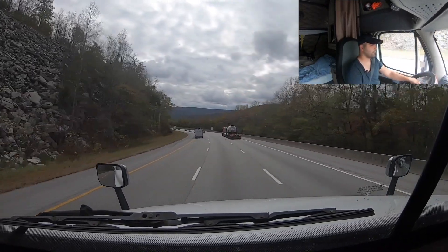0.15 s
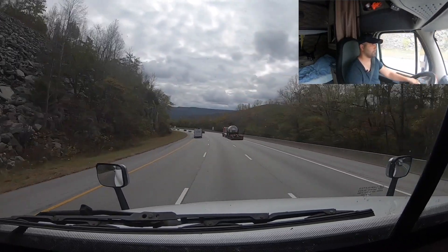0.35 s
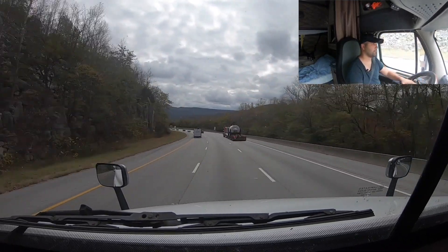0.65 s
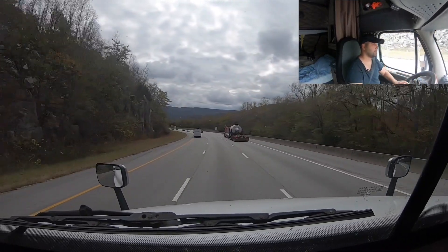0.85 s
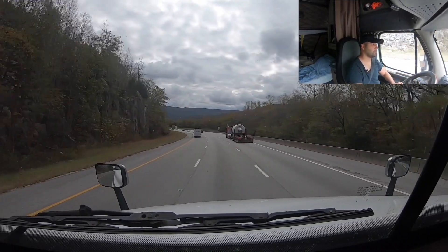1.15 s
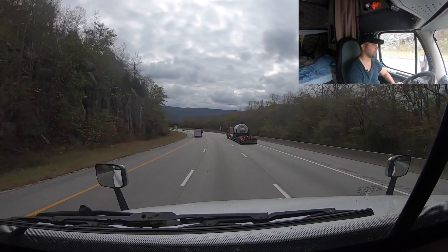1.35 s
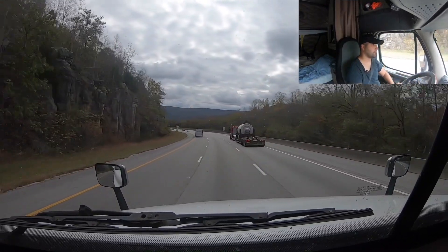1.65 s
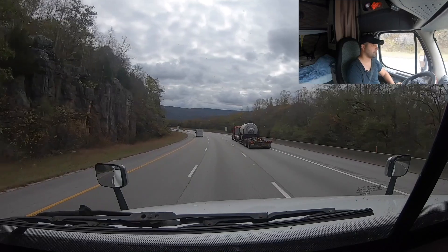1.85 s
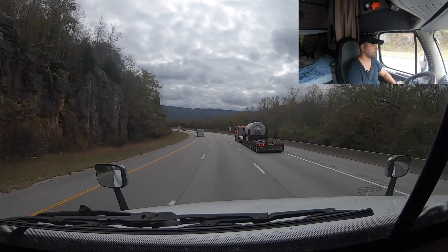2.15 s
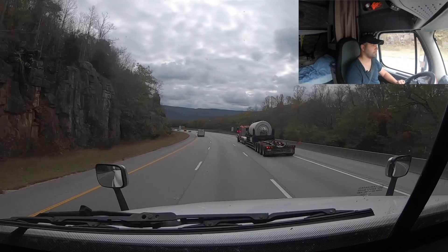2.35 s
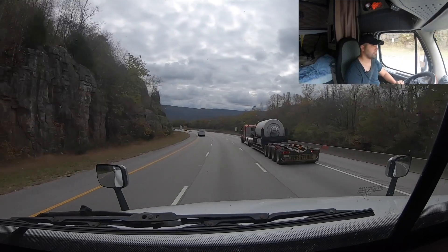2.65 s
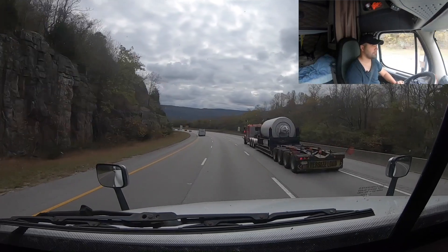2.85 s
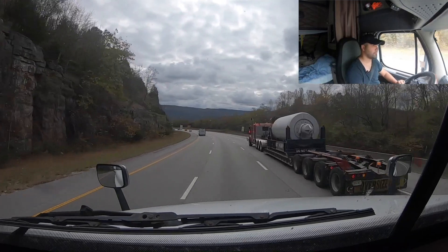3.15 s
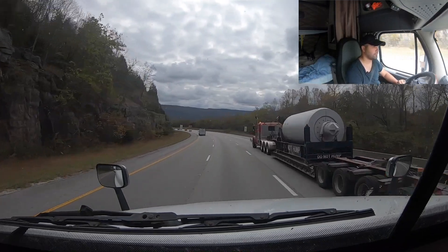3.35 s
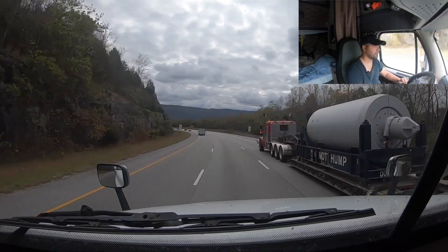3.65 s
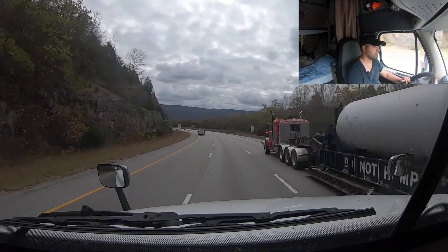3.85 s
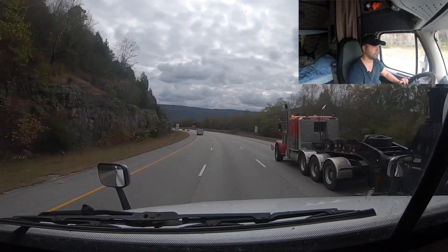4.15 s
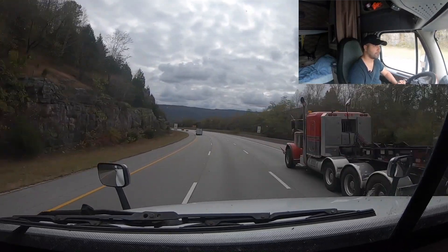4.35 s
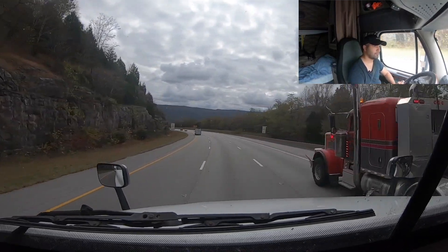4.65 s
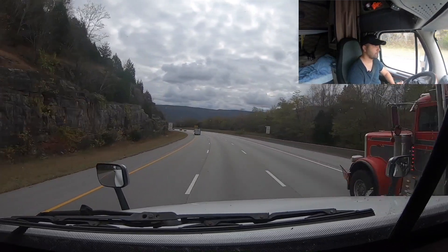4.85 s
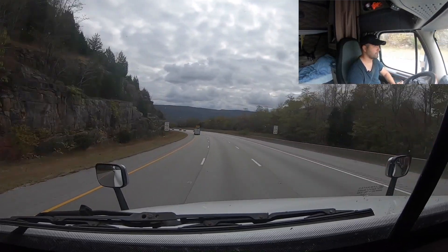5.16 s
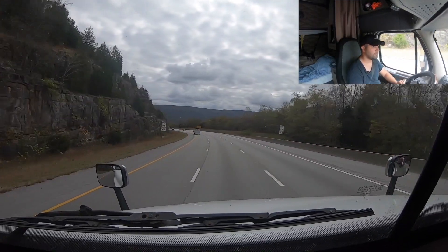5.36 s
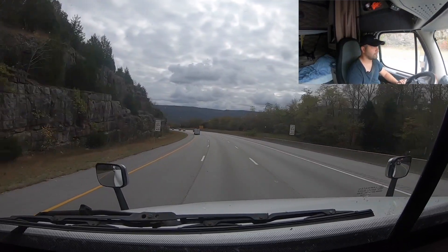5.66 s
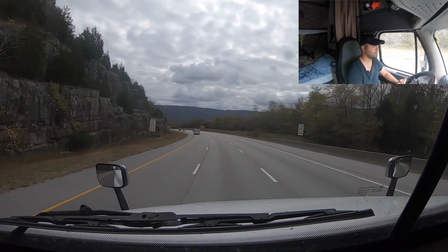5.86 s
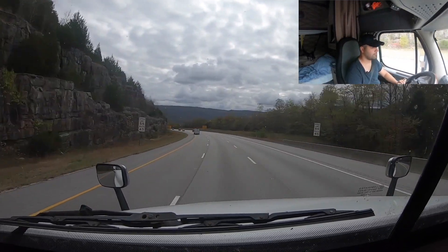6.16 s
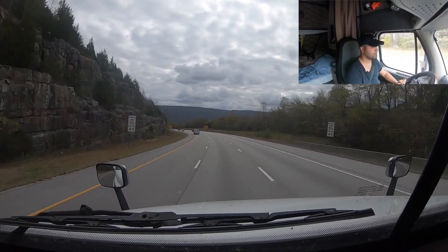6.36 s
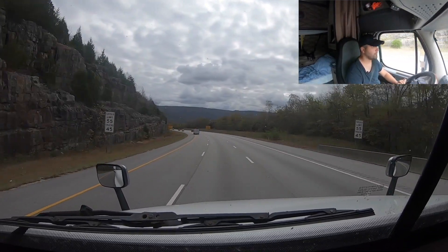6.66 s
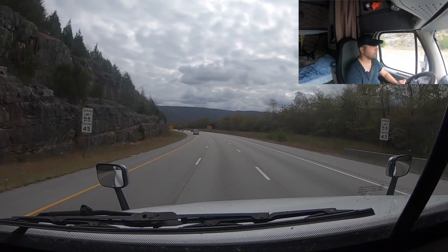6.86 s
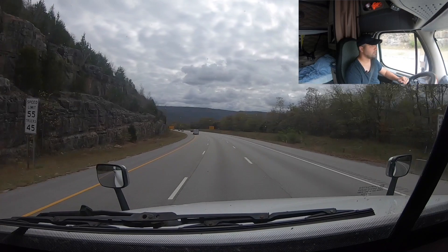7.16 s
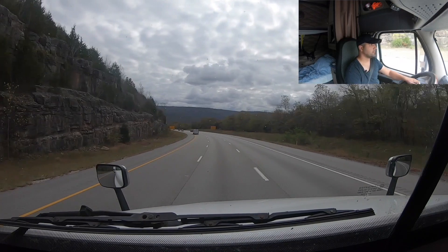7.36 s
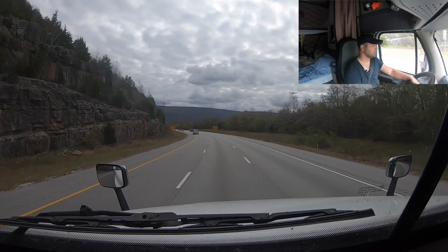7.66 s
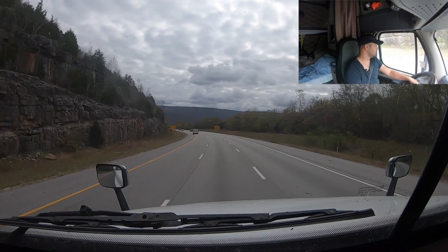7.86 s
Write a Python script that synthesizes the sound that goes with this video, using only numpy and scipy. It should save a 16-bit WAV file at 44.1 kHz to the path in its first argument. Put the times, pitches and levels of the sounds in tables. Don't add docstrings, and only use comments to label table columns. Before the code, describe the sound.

Inside a heavy truck cab, heard close to the dash, a big diesel drones low and steadily under engine braking, with rough clatter, valve hiss, a thin unsteady turbo whine, gear hum, tyre rumble and wind. Loose trim ticks, crackles and squeaks throughout. Around 2.1 s the brake releases with a soft low thump; clatter and hiss fall back and the whine sinks. At about 3 s the brake bites again and the whine climbs. From roughly 4 s a slower truck's exhaust swells alongside, beating against the cab's own drone, strongest near 5 s, then drops in pitch and fades by 6 s. Around 5.5 s braking releases again and a deep pulsing boom fills the cab, strongest near 6.2 s, easing unevenly. From about 6.9 s a faint door-seal whistle joins the hiss. Near 7.9 s the seat gives a short click and creak.

```python
import sys
import numpy as np
from scipy import signal
from scipy.fft import rfft, irfft
from scipy.io import wavfile
from scipy.ndimage import uniform_filter1d, map_coordinates

SR = 44100
rng = np.random.default_rng(int(sys.argv[2]) if len(sys.argv) > 2 else 0)


def voltage_ratio(level):
    return 10 ** (np.asarray(level, float) / 20)


def dump(signal):
    limited = np.clip(np.atleast_2d(signal).T, -1, 1)
    pcm = np.round(limited * 32767).astype(np.int16)
    wavfile.write(sys.argv[1], SR, pcm)


N = 353241
T = np.arange(N) / SR
PADDED = N + 39
HZ = np.maximum(np.fft.rfftfreq(PADDED, 1 / SR), 1)

# (time [s], rate [Hz])
CYCLE = [(0, 12.68), (1.9, 12.65), (2.9, 12.85), (5.4, 12.82), (6, 12.99), (7, 13.13), (8.1, 13.28)]
# (frequency [Hz], density [dB per Hz])
ROAD_COLOUR = [(5.9, -28), (10, -17), (38, -11), (108, -10.5), (138, -8), (226, -13.5), (289, -12),
               (382, -18), (645, -20.5), (879, -24), (1630, -46), (4510, -59.5), (6150, -51.5),
               (11800, -58.5), (16000, -61.5)]


def curve(table):
    s, value = np.transpose(table)
    return np.interp(T, s, value)


def shape(x, gain):
    return irfft(rfft(x, PADDED) * gain, PADDED)[:N]


def colour(table):
    hz, db = np.transpose(table)
    return voltage_ratio(np.interp(np.log(HZ), np.log(hz), db))


def peak(hz, width):
    return 1 / np.sqrt(1 + (2 * (HZ - hz) / width) ** 2)


def unit(x):
    return x / np.sqrt(np.mean(x ** 2))


def walk(rate):
    k = int(SR / rate)
    held = np.repeat(rng.standard_normal(600), k)[:N]
    return 1.45 * uniform_filter1d(uniform_filter1d(held, k), k)


def sine(turns, db):
    return np.sqrt(2) * voltage_ratio(db) * np.sin(2 * np.pi * turns)


def tone(turns, db, wander_db):
    return sine(turns + rng.random(), db + wander_db * walk(3.53))


def panels(share):
    # (frequency [Hz], width [Hz], level [dB])
    rings = [(348, 26, 7.5), (508, 16, 2), (752, 15, 8), (780, 36, 1.5), (1857, 25, 6), (2112, 14, -3),
             (3090, 20, 4.5)]
    return 1 + share * sum((voltage_ratio(db) - 1) * peak(hz, w) ** 2 for hz, w, db in rings)


def air(bands, flicker_db):
    out = 0
    for hz, width, db in bands:
        hiss = unit(shape(rng.standard_normal(N), peak(hz, width) ** 2))
        out = out + voltage_ratio(db + flicker_db * walk(25)) * hiss
    return out


def engine_orders(turns, brake):
    # (multiple of the cycle, braking level [dB rms], coasting level [dB rms], wander [dB])
    orders = [(1, -34, -38, 3), (2, -31, -29, 2.5), (4, -35, -34, 1.8), (7, -41, -35, 3),
              (8, -41, -44, 2.5), (9, -38, -30, 1), (10, -34, -42, 1.2), (18, -44, -53, 1.2),
              (20, -52, -54, 2), (21, -56, -50, 2), (26, -50, -49, 2), (27, -47, -51, 2.5),
              (30, -56, -50, 2), (32, -52, -58, 2), (36, -55, -53, 2), (38, -51, -54, 2), (57, -53, -55, 3),
              (64, -56, -60, 3), (66, -55, -59, 3), (72, -57, -62, 2), (69, -60, -55, 2),
              (83, -53, -68, 1.5), (93, -63, -72, 2), (126, -75, -70, 2), (144, -76, -72, 2)]
    # (multiple of the cycle, level [dB rms])
    valves = [(40, -55), (75, -58), (76, -59), (77, -59), (81, -62), (84, -60), (85, -63), (86, -63),
              (91, -64), (108, -66), (114, -67), (123, -68), (136, -69), (138, -70), (144, -69), (146, -70),
              (157, -71), (165, -72)]
    shifted = turns + 0.0208 * brake
    hum = sum(tone(k * shifted, off_db + (on_db - off_db) * brake, w) for k, on_db, off_db, w in orders)
    return hum + brake * sum(tone(k * turns, db, 2.5) for k, db in valves)


def driveline(turns, brake):
    # (multiple of the cycle, braking level [dB rms], coasting level [dB rms], wander [dB])
    shafts = [(1.21, -28, -30, 3.5), (2.824, -24.5, -29, 1.2), (8.473, -34.5, -39, 1.2),
              (33.38, -53, -52, 2), (62.12, -56, -62, 2), (97.75, -66, -63, 2)]
    out = sum(tone(k * turns, off_db + (on_db - off_db) * brake, w) for k, on_db, off_db, w in shafts)
    brake_db, coast_db, fade_db_per_s = -33, -39.5, -0.19
    mesh_db = coast_db + (brake_db - coast_db) * brake + fade_db_per_s * T
    dip_s, dip_span_s, dip_db = 5.2, .35, -4.5
    mesh_db = mesh_db + dip_db * np.exp(-((T - dip_s) / dip_span_s) ** 2)
    wheel_turns = .353 * turns
    mesh_db = mesh_db + (4.5 - 2.5 * brake) * np.cos(2 * np.pi * (wheel_turns + .4))
    twist = .45 * uniform_filter1d(brake, SR // 5)
    return out + tone(22 * turns + twist, mesh_db, 1.3)


def cab_boom(turns):
    # (time [s], level [dB rms])
    firing = [(0, -33.5), (.65, -28.5), (1.2, -49), (2.2, -48), (2.6, -33), (3.2, -39), (4, -25), (5, -26),
              (5.35, -29), (5.5, -16.5), (5.9, -17), (6.2, -14.5), (6.6, -16.5), (7.15, -21.5), (7.35, -18),
              (7.6, -20.5), (7.8, -26), (8.1, -30)]
    # (time [s], level [dB rms])
    overtone = [(0, -47), (1.1, -40.5), (1.8, -35), (2.3, -36), (3.3, -36), (4.5, -37), (5.6, -34),
                (6.25, -36), (6.45, -31), (7.25, -34), (7.5, -40), (8.1, -43)]
    return sine(6 * turns, curve(firing)) + tone(12 * turns, curve(overtone), 1)


def panel_tones(turns, brake):
    ring_hz, ring_width_hz, ring_db = 885, 9, -46.5
    out = 0
    for k in range(67, 72):
        off_tune = 2 * (k * curve(CYCLE) - ring_hz) / ring_width_hz
        out = out + tone(k * turns, ring_db - 9 * (1 - brake), 1.5) / np.hypot(1, off_tune)
    buzz_s, buzz_span_s, buzz_db = 4.1, .45, -53
    return out + sine(79 * turns, buzz_db - 10 * ((T - buzz_s) / buzz_span_s) ** 2)


def clatter(turns, brake):
    # (frequency [Hz], level [dB])
    blow_colour = [(150, -4.5), (330, -10), (500, -3.5), (650, -9), (900, -7.5), (1100, -15), (1500, -18),
                   (2200, -31), (3500, -32.5), (5000, -75)]
    on_db, off_db = -39.5, -47
    drift, change = .9, 1.1
    patterns = rng.standard_normal((40, 2048))
    steady = rng.standard_normal(2048)
    blows = map_coordinates(steady + change * patterns, [drift * T, turns % 1 * 2047], order=1)
    heard = unit(shape(blows, colour(blow_colour) * panels(0.52)))
    return voltage_ratio(off_db + (on_db - off_db) * brake) * heard


def brake_air(brake):
    # (frequency [Hz], width [Hz], level [dB rms])
    blowdown = [(5770, 500, -76), (6260, 600, -69), (6660, 120, -70), (6900, 330, -72), (14900, 1100, -67)]
    return brake * air(blowdown, 1.7)


def vents():
    # (frequency [Hz], width [Hz], level [dB rms])
    leaks = [(8400, 410, -79), (11900, 900, -80)]
    return air(leaks, 3.1)


def turbo(brake):
    idle_hz, kick_hz = 7800, 300
    up_s, down_s = 1.15, .4
    full = 807.5 * curve(CYCLE) - kick_hz
    hz, step = [full[0]], 441
    for on, full_hz in zip(brake[::step] > .5, full[::step]):
        target, lag_s = (full_hz, up_s) if on else (idle_hz, down_s)
        hz.append(hz[-1] + (target - hz[-1]) * step / SR / lag_s)
    hz = np.interp(T, np.arange(len(hz)) * step / SR, hz)
    boost = (hz - idle_hz) / (full - idle_hz)
    db = -67.8 - 6.5 * (1 - brake) + 6 * np.log10(boost) - 12 * np.clip(1 - 6 * boost, 0, 1)
    duct_hz, duct_width_hz, duct_db = 8330, 500, 7
    db = db + duct_db * (1 - brake) / (1 + (2 * (hz - duct_hz) / duct_width_hz) ** 2)
    hz = hz + kick_hz * brake
    skirt = unit(shape(rng.standard_normal(N), peak(0, 250)))
    flutter = voltage_ratio(2.8 * walk(30) + 1.1 * walk(7) - 1)
    return (flutter + .8 * skirt) * sine(np.cumsum(hz + 8 * walk(60)) / SR, db)


def road(turns, brake):
    noise = rfft(rng.standard_normal(PADDED)) * colour(ROAD_COLOUR) * panels(.6)
    low, mid, high, top = (1 / (1 + (HZ / hz) ** 6) for hz in (80, 1300, 5000, 8500))

    def band(gain):
        return unit(irfft(noise * gain)[:N])

    throb_db = (0.34 + walk(2.93)) * np.cos(2 * np.pi * (turns + 0.38)) + 1.1 * walk(25) + 0.4 * walk(7.4)
    alongside_s, span_s = 4.75, 1.4
    near = 1 / (1 + ((T - alongside_s) / span_s) ** 4)
    rumble_db = -28.5 + 3 * near + 1.3 * walk(3.99)
    roar_db = -33 + 2 * near + 0.73 * walk(3) - 1.5 * brake
    hiss_db = -57 + 0.5 * near + 3.5 * brake
    wind_db = hiss_db + 7 - 2.3 * brake + 0.3 * throb_db + 0.55 * walk(20)
    out = voltage_ratio(rumble_db) * band(low)
    out = out + voltage_ratio(roar_db) * band(mid - low)
    out = out + voltage_ratio(wind_db) * band(high - mid)
    out = out + voltage_ratio(hiss_db - 13.5 + .5 * throb_db) * band(top - high)
    return out + voltage_ratio(hiss_db - 6.5 + throb_db) * band(1 - top)


def crackle(brake):
    rate, level_db, decay_s = 55, -57, 0.0045
    size_db = np.minimum(3 * rng.exponential(size=N), 9)
    hits = (rng.random(N) < rate / SR) * voltage_ratio(size_db)
    tail = signal.lfilter([1], [1, -np.exp(-1 / (decay_s * SR))], hits)
    snaps = shape(tail * rng.standard_normal(N), peak(10800, 4000) ** 2)
    return voltage_ratio(level_db - 1.7 * brake) * snaps


def chirps():
    rate, half_length_s, over_road_db = 200, .012, -13.5
    out, t = np.zeros(N + SR), T[:1600]
    hz, db = np.transpose(ROAD_COLOUR)
    envelope = np.exp(-((t - .018) / half_length_s) ** 2)
    for at, pitch, size in rng.random((int(rate * N / SR), 3)):
        f = 1000 + 14500 * pitch ** 1.2
        road_db = np.interp(np.log(f), np.log(hz), db)
        level = voltage_ratio(road_db + over_road_db + 6 * size - 3 + 4 * (f < 3500))
        out[int(at * N):][:len(t)] += level * envelope * np.sin(2 * np.pi * f * t)
    return out[:N]


def shakes(turns):
    angle, size, pitch = rng.standard_normal((int(turns[-1]), 3)).T
    s = np.interp(np.arange(len(angle)) + .5 + .13 * angle, turns, T)
    return list(zip(s + .002, -44.5 + 3 * size, 11300 * (1 + .06 * np.clip(pitch, -2, 2))))


def trim_ticks(turns):
    # (time [s], peak level [dB], centre [Hz])
    plain = [(0.3556, -40, 10600), (0.9702, -41, 10200), (1.0665, -42, 10400), (1.8347, -37, 7660),
             (2.0807, -41, 11700), (2.1246, -38, 9080), (2.2034, -47, 8130), (2.2533, -38, 8310),
             (2.3755, -45, 8380), (2.4803, -47, 8750), (2.596, -49, 8480), (2.828, -41, 9080),
             (2.8754, -48, 11600), (2.9896, -37, 9660), (3.2026, -50, 8750), (3.4376, -46, 9910),
             (3.9534, -45, 8590), (4.1091, -42, 10400), (4.356, -41, 9670), (4.4204, -43.5, 9570),
             (4.8249, -42, 7610), (4.8798, -38, 9550), (5.435, -39, 8100), (5.6032, -42, 8140),
             (5.682, -46, 11500), (5.9434, -46, 7930), (6.0342, -46, 7760), (6.3425, -49, 10900),
             (6.4976, -43, 9660), (6.6054, -47, 7740), (6.6653, -48, 7820), (6.7101, -44, 7040),
             (6.7685, -46, 8810), (6.8339, -43, 10500), (7.0948, -46, 8190), (7.3472, -46, 11500),
             (7.4131, -47, 8260), (7.636, -48, 12200)]
    ticks = list(plain) + shakes(turns)
    out, t = np.zeros(N + SR), T[:3000]
    bright = signal.butter(2, 4500, "high", fs=SR, output="sos")
    fade = (1 - np.exp(-t / .006)) * np.exp(-t / .011)
    for (s, db, hz), noise in zip(ticks, rng.standard_normal((len(ticks), 3000))):
        ring = signal.filtfilt(*signal.iirpeak(hz, 2.2, SR), noise)
        out[int((s - .002) * SR):][:3000] += voltage_ratio(db) * signal.sosfilt(bright, ring) * fade
    return out[:N]


def driveline_thump():
    # (time [s], peak level [dB], frequency [Hz], t60 [s])
    thumps = [
        (2.172, -28, 107, .3),
    ]
    out, t = np.zeros(N + SR), T[:SR // 2]
    for s, db, hz, t60 in thumps:
        swell = (1 - np.exp(-t / .02)) * voltage_ratio(-60 * t / t60)
        out[int(s * SR):][:len(t)] += voltage_ratio(db) * np.sin(2 * np.pi * hz * t) * swell
    return out[:N]


def other_truck(own_turns):
    # (time [s], rate [Hz])
    other_cycle = [(3, 13.25), (3.9, 13.32), (4.5, 13.55), (5, 13.6), (5.5, 13.02), (6.2, 12.95)]
    # (loudest time [s], level [dB rms], rise from 10 dB below [s], fall to 10 dB below [s])
    swells = [(4.95, -23, 1.23, 0.23), (5.26, -19, 0.02, 0.32), (5.25, -36, 0.9, 0.5),
              (4.92, -23, 0.28, 0.2), (5.55, -22, 0.2, 0.16), (5.18, -31, .4, .5), (5.13, -32.5, 0.8, 0.85),
              (5.2, -36, -0.2, 0.2), (4.6, -34, 0, 0.6), (5.3, -25, 0.15, 0.23)]
    swell_orders = (6, 9.85, 10, 12, 12, 13, 14, 15, 8.3, 11.85)
    in_step_s = 4.73
    turns = np.cumsum(curve(other_cycle)) / SR
    turns = turns + np.interp(in_step_s, T, own_turns - turns)
    out = 0
    for i, (k, (s, db, rise, fall)) in enumerate(zip(swell_orders, swells)):
        level_db = db - 10 * ((T - s) / np.where(T < s, rise, fall)) ** 2
        out = out + (sine(k * turns, level_db) if i == 0 else tone(k * turns, level_db, .5))
    return out


def door_seal():
    # (frequency [Hz], width [Hz], level [dB rms])
    whistles = [(6150, 220, -72), (10530, 100, -78)]
    # (time [s], share open [0-1])
    opening = [
        (0, 0),
        (6.2, 0.1),
        (6.9, 1),
        (8.1, 0.9),
    ]
    return curve(opening) * air(whistles, 2.5)


def seat_creak():
    # (time [s], peak level [dB], centre [Hz])
    creaks = [
        (7.94, -44, 3500),
        (7.93, -29, 2650),
    ]
    creak_decay = (.1, .007)
    creak_q = (3, 16)
    out, t = np.zeros(N + SR), T[:SR // 2]
    for (s, db, hz), tail_s, q in zip(creaks, creak_decay, creak_q):
        swell = (1 - np.exp(-t / 0.004)) * np.exp(-t / tail_s)
        ring = signal.lfilter(*signal.iirpeak(hz, q, SR), rng.standard_normal(len(t)))
        out[int(s * SR):][:len(t)] += voltage_ratio(db) * swell * ring
    return out[:N]


def scene():
    # (time [s], engaged [0-1])
    braking = [
        (0, 0.92),
        (2.08, 0.86),
        (2.18, 0),
        (2.97, 0.16),
        (3.07, 0.96),
        (5.46, 0.84),
        (5.56, 0.06),
        (8.1, 0),
    ]
    turns = np.cumsum(curve(CYCLE)) / SR
    brake = np.clip(curve(braking), 0, 1)
    engine = engine_orders(turns, brake) + cab_boom(turns) + clatter(turns, brake)
    running_gear = driveline(turns, brake) + driveline_thump()
    airs = brake_air(brake) + vents() + turbo(brake) + door_seal()
    trim = panel_tones(turns, brake) + crackle(brake) + chirps() + trim_ticks(turns) + seat_creak()
    return (engine + running_gear + airs + road(turns, brake) + trim + other_truck(turns))[None]


def band_limit(x):
    return signal.sosfilt(signal.butter(12, 16660, fs=SR, output="sos"), x)


def record(dry):
    softened = np.tanh(.3 * dry[0]) / .3
    mix = shape(softened, HZ < 15720)[None]
    return band_limit(mix)


dry = scene()
out = record(dry)
dump(out)
```